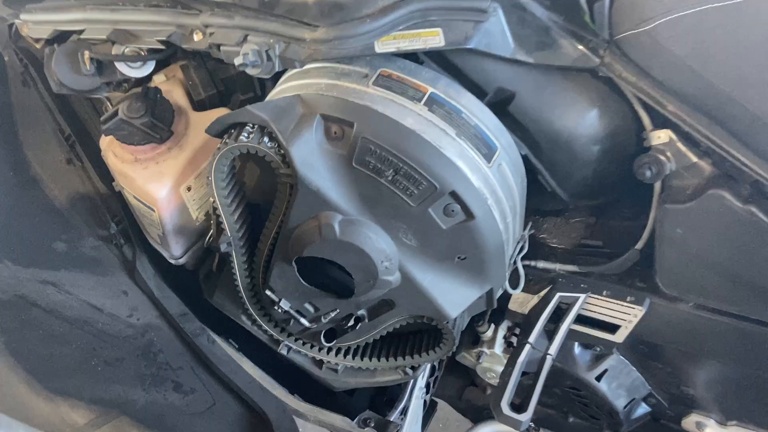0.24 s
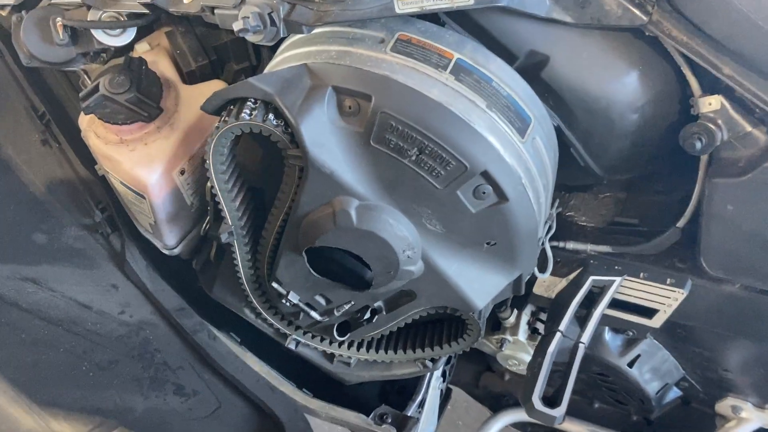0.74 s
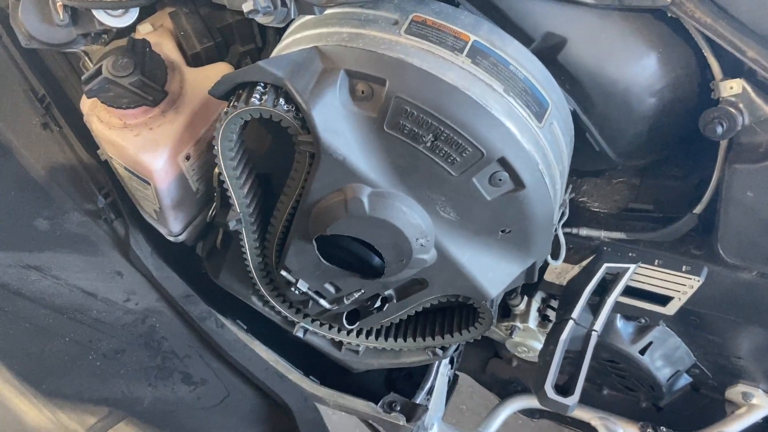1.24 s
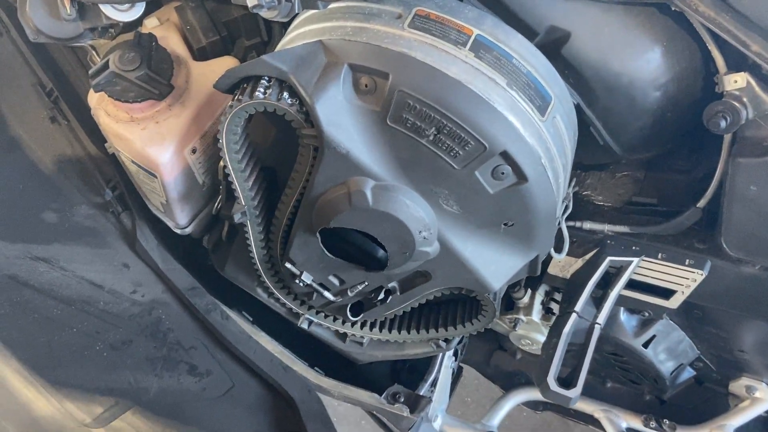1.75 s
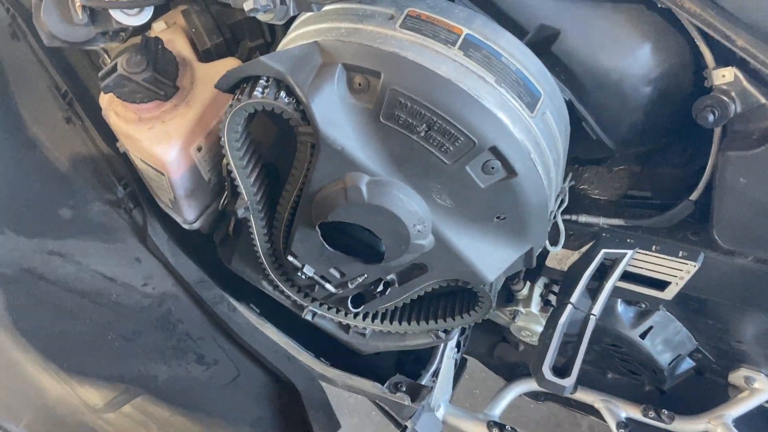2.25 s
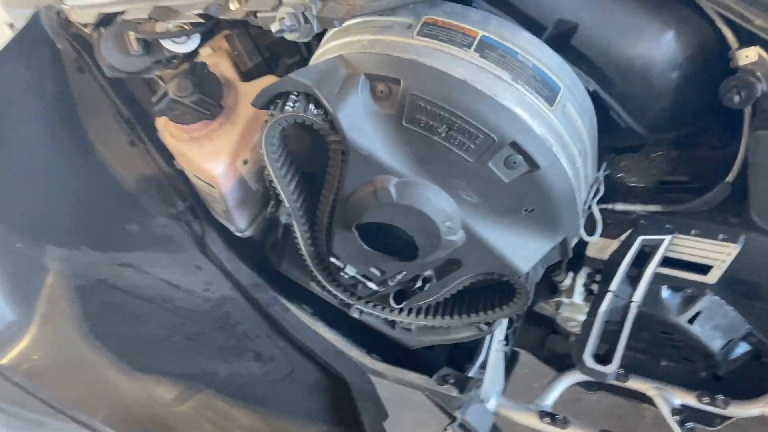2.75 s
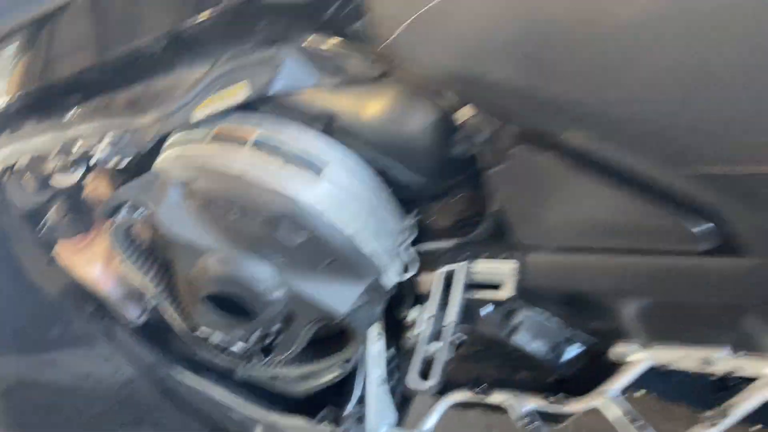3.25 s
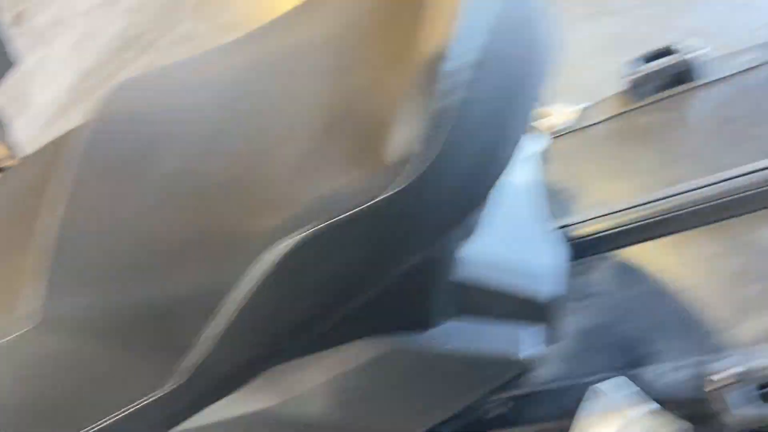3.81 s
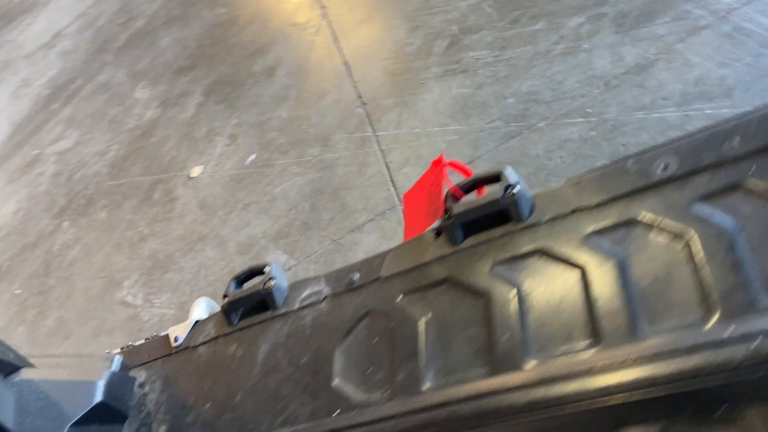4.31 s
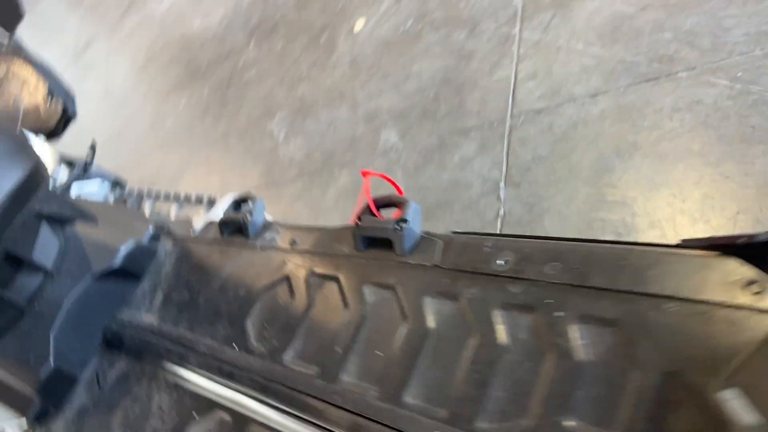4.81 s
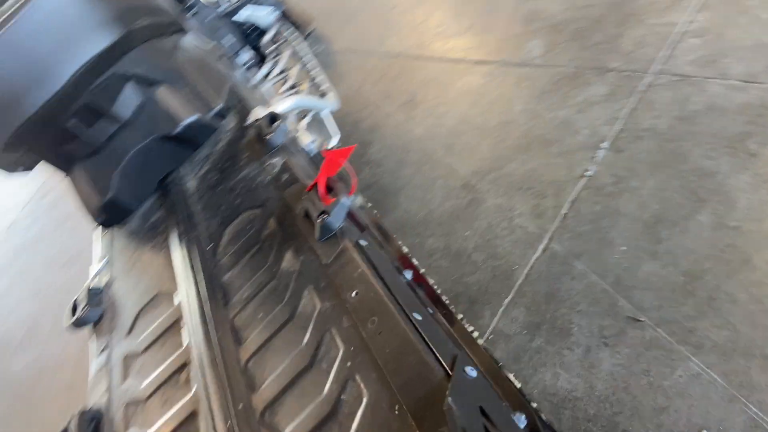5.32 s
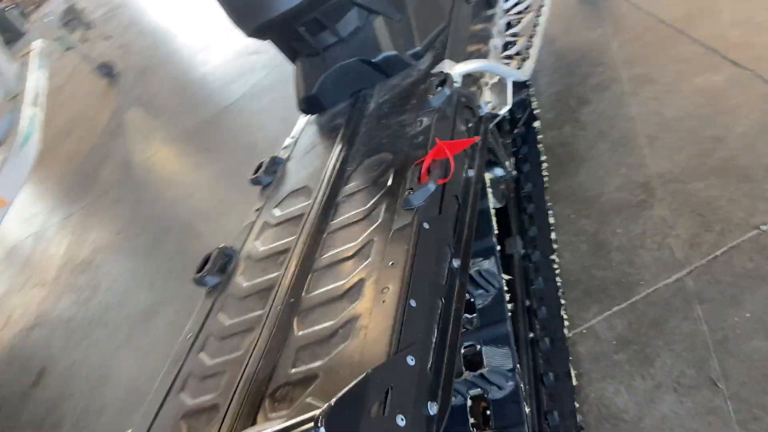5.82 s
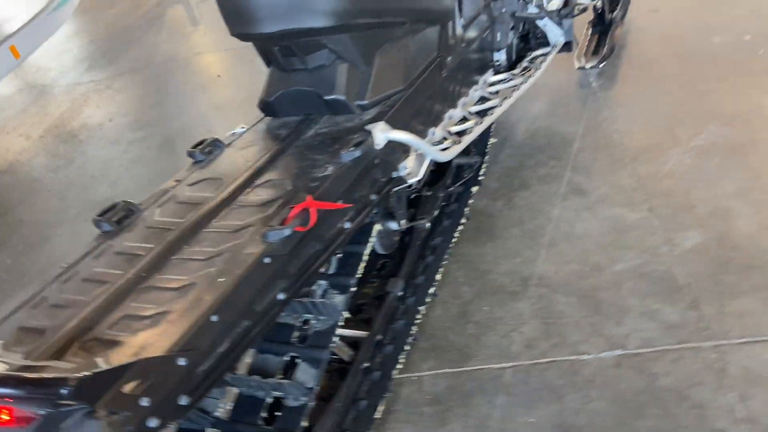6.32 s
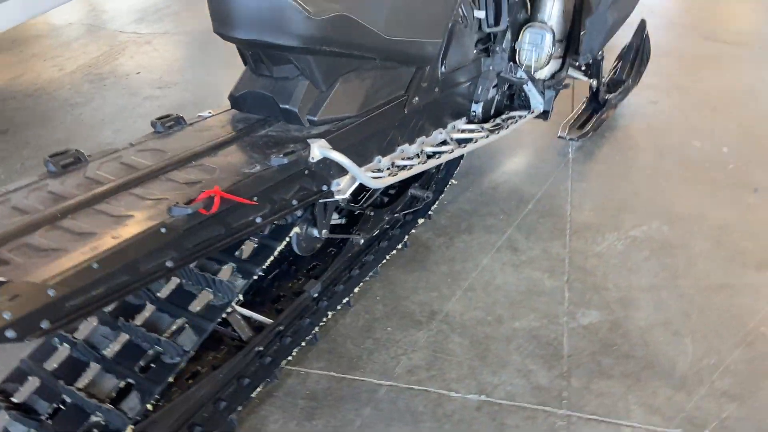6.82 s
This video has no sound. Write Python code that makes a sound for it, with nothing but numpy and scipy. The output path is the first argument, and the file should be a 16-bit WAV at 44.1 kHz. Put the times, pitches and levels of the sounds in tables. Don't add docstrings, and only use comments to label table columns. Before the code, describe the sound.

Handheld close pickup of a snowmobile engine idling indoors, running throughout. It begins bright and busy: a low exhaust hum, rapid rough chugging, sharp slaps and rattling metal over airy hiss. Midway the microphone moves behind the seat, briefly passing brighter rattles, and the engine becomes duller and quieter with a cluster of hollow misfire knocks. Finally, beside the track, the drone strengthens and a thin panel buzzes with each turn.

```python
import sys
import numpy as np
from scipy import signal
from scipy.fft import rfft, irfft, next_fast_len
from scipy.io import wavfile
from scipy.ndimage import uniform_filter1d

SR = 44100
rng = np.random.default_rng(int(sys.argv[2]) if len(sys.argv) > 2 else 0)


def voltage_ratio(level):
    return 10 ** (np.asarray(level, float) / 20)


def transcribe(u):
    v = np.clip(np.atleast_2d(u).T, -1, 1)
    q = np.round(v * 32767).astype(np.int16)
    wavfile.write(sys.argv[1], SR, q)


N = 311330


# time in seconds, level of the sixth crank order in dB.
DRONE = [(0, -18.5), (.1, -17.5), (.5, -17), (1.5, -15.5), (1.95, -17.5), (2.2, -16.5), (2.4, -17.5),
         (2.7, -17), (3.2, -17), (3.7, -19.5), (4.3, -22), (4.8, -22), (5.1, -22), (5.5, -20.5),
         (5.85, -20), (6.5, -18.5), (6.95, -17), (7.06, -18)]
# order, then dB over the bay, behind the seat, by the track.
FIRING = [(2, -10, -7.5, -12), (4, -11.5, -10.5, -15), (8, -17, -15.5, -17.5), (10, -27, -20.5, -41),
          (14, -13.5, -13.5, -18), (16, -33, -14, -22), (20, -20, -14.5, -23.5)]
# order, then dB at the same three places.
UNEVEN = [(3, 3, 4.5, 3), (5, 1.5, 0, 3), (7, -2.5, 2.5, 1.5), (9, -3, -7, -5.5), (11, -2.5, -3, -9),
          (13, -5, -4.5, -9), (17, -2.5, 2, -9), (19, -20, 1, -1)]
# time in seconds, twelfth order in dB, eighteenth order in dB.
FLOOR_LIFT = [(0, -1, -10), (.4, -3, -10), (.9, 1, 0), (1.25, -1, 3), (1.5, -3, -6), (2.1, -3, 1),
              (2.5, -1, 1), (2.95, 1, -6), (3.9, -5, -5.5), (4.2, 0, -1.5), (5.0, 1, 2), (5.5, 1, -1),
              (5.9, -6, -10.5), (6.4, 0, 0), (7.06, -0.5, 1)]
# over the bay in dB, behind the seat in dB, by the track in dB.
TWELFTH = (-31.5, -27.5, -27)
EIGHTEENTH = (-29.5, -30, -29.5)
THIRD = (-37.5, -34, -35.5)
CHOKE = (0.092, .8, 0.76)


def exhaust(turns, place):
    angle = 2 * np.pi * (turns + 0.022)

    def tone(order, late):
        strength = voltage_ratio(0.069 * order * wobble(20)) * np.sqrt(2)
        return strength * np.cos(order * angle - late + 0.017 * order * wobble(11))

    def wandering(order):
        return wobble(11) * np.cos(order * angle) + wobble(11) * np.sin(order * angle)

    twelfth_lift, eighteenth_lift = curves(FLOOR_LIFT)
    sixth_db = curves(DRONE)[0] - seen(place, CHOKE) * gasps(PUFF_S) + 0.51 * wobble(8)
    twelfth_db = seen(place, TWELFTH) + twelfth_lift + 0.8 * wobble(5)
    eighteenth_db = seen(place, EIGHTEENTH) + eighteenth_lift + 0.8 * wobble(5)
    third_db = seen(place, THIRD) + 1.28 * gasps(LUMP_S)
    tuned = voltage_ratio(sixth_db - 0.1) * tone(order=6, late=0)
    tuned = tuned + voltage_ratio(twelfth_db - 1.5) * tone(order=12, late=0)
    tuned = tuned + voltage_ratio(eighteenth_db - 0.4) * tone(order=18, late=0)
    even = sum(voltage_ratio(seen(place, dbs)) * tone(order, np.pi / 2 if order < 6 else np.pi)
               for order, *dbs in FIRING)
    odd = sum(voltage_ratio(seen(place, dbs)) * wandering(order) for order, *dbs in UNEVEN)
    even_level = voltage_ratio(uniform_filter1d(sixth_db, size=SR // 3))
    return tuned + even_level * even + voltage_ratio(third_db - 3.0) * odd


def clatter(turns, place):
    rattle = contact_noise(turns, axis=3, bed_db=-7)
    return (block_rumble(turns, place) + case_ring(turns, place, rattle)
            + piston_slap(turns, place) + loose_parts(turns, rattle))


# frequency in Hz, density in dB per Hz.
RUMBLE = [(25, -30), (40, -1.5), (100, 1.5), (150, 1), (200, -0.5), (380, 0), (480, -4.5), (700, -5),
          (1300, -28.5)]
# share of the shade, share of a gasp, own flutter in dB, then dB at bay, seat and track.
RUMBLE_MIX = (0.43, 1.08, 1, -28.5, -29, -30.5)
GASP_HEARD = (1, .6, .6)


def block_rumble(turns, place):
    db = level_db(place, RUMBLE_MIX) - (1 - seen(place, GASP_HEARD)) * gasps(PUFF_S)
    shaking = contact_noise(turns, axis=2, bed_db=4.0)
    return voltage_ratio(db + 5) * unit(filtered(shaking, lambda hz: voltage_ratio(along(RUMBLE, hz))))


# frequency in Hz, width in Hz, level in dB.
CASE = [(474, 64, -0.5), (845, 82, -2), (983, 95, 1), (1125, 112, -5), (1432, 140, -7.5)]
# frequency in Hz, width in Hz, level in dB.
CASE_FAR = [(778, 143, -4), (1020, 210, -3.5), (1465, 440, -11.5)]
# frequency in Hz, width in Hz, level in dB.
PISTON = [(1117, 246, 4.5), (4600, 700, -17)]
# frequency in Hz, width in Hz, level in dB.
BELL = [(1000, 135, 1.5), (1493, 130, -3.5)]
CASE_MIX = (0.98, -0.08, 1, -23, -24.5, -25.5)


def case_ring(turns, place, rattle):
    open_bay = bay_in_view(place)
    first = unit(filtered(taps(turns, .11), twice(PISTON)))
    cover_taps = 0.95 * taps(turns, .6) + taps(turns, .72) + 0.65 * taps(turns, 0.24)
    second = unit(filtered(cover_taps, twice(BELL)))
    bare = .7 * unit(filtered(rattle, ringing(CASE))) + .32 * first + .55 * second
    far = unit(filtered(rattle, ringing(CASE_FAR)))
    case = np.sqrt(open_bay) * bare + np.sqrt(1 - open_bay) * far
    return voltage_ratio(level_db(place, CASE_MIX) + 0.86) * case


# frequency in Hz, density in dB per Hz.
SLAP = [(500, -9.5), (1300, -1), (2000, -1), (3000, -8.5), (4300, -10), (5200, -14), (6200, -16.5),
        (7000, -60)]
SLAP_MIX = (0.52, 0.61, 0.64, -33.5, -32.5, -37)


def piston_slap(turns, place):
    open_bay = bay_in_view(place)
    behind = np.clip(1 - np.abs(place - 1), 0, 1)
    echoes = .5 * (1 - open_bay) * rng.standard_normal((2, N))
    ticks = 8 * taps(turns, .095) + 6 * taps(turns, .575)
    slaps = contact_noise(turns, axis=4, bed_db=-5.5) + echoes + (.35 + .65 * open_bay) * ticks
    slap = unit(filtered(slaps, lambda hz: voltage_ratio(along(SLAP, hz))))
    return voltage_ratio(level_db(place, SLAP_MIX) + 6.5) * (1 - 0.46 * behind) * slap


# time in seconds, belt guard in dB, seat frame in dB.
PASSING = [(0, -49, -55), (3.0, -46, -50), (3.27, -33, -44), (3.55, -42.5, -40), (3.8, -50, -36),
           (4.1, -55, -39), (4.5, -58, -43), (5.2, -60, -53), (7.06, -60, -55)]
# time in seconds, level in dB.
PANEL = [(0, -44), (3.2, -43), (3.8, -50), (5.25, -50), (5.55, -38), (6.3, -37), (7.06, -36.5)]
# frequency in Hz, width in Hz, level in dB.
SEAT = [(2690, 1300, 0.75)]
# frequency in Hz, width in Hz, level in dB.
GUARD = [(2504, 250, -1), (3320, 410, -4.5)]
# frequency in Hz, width in Hz, level in dB.
SHEET = [(1895, 140, 0), (2650, 300, -10), (1500, 150, -9)]


def loose_parts(turns, rattle):
    guard_db, frame_db = curves(PASSING)
    panel_db, = curves(PANEL)
    frame = unit(filtered(contact_noise(turns, axis=5, bed_db=4, scatter_db=2.5), twice(SEAT)))
    guard_taps = taps(turns, .11, 2.2) + 0.9 * taps(turns, .6, 3.3)
    guard = unit(filtered(0.047 * rattle + guard_taps, twice(GUARD)))
    panel_taps = taps(turns, .17, 1.6) + .2 * taps(turns, .7, 2.5)
    panel = unit(filtered(.008 * rattle + panel_taps, twice(SHEET)))
    return voltage_ratio(panel_db) * panel + voltage_ratio(guard_db) * guard + voltage_ratio(frame_db) * frame


# time in seconds, peak in dB, crack against it in dB.
SLAPS = [(0.1575, -12, -18), (0.2593, -12, -16), (0.3631, -12, -13), (0.5706, -10, -15), (0.6714, -13, -12),
         (0.7736, -10, -16), (0.8754, -12, -17), (0.9802, -17, -18), (1.0819, -13, -12), (1.1842, -12, -15),
         (1.2865, -11, -15), (1.3384, -12, -20), (1.495, -12, -19), (1.5469, -12, -15), (1.6516, -13, -11),
         (1.7534, -12, -11), (1.8058, -11, -15), (1.9565, -12, -14), (2.0587, -11, -20), (2.1076, -14, -17),
         (2.2129, -12, -15), (2.3635, -12, -16), (2.5701, -14, -14), (2.6209, -11, -17), (2.7257, -12, -15),
         (2.8744, -12, -17), (3.021, -14, -14), (3.1527, -14, -13)]
# time in seconds, peak in dB.
KNOCKS = [(3.594, -16), (3.747, -17), (3.98, -12), (4.131, -15), (4.184, -19), (4.238, -8.5), (4.312, -16),
          (4.388, -15), (4.44, -11), (4.493, -11), (4.568, -15), (4.745, -13), (5.759, -22), (6.163, -10.5)]
# frequency in Hz, width in Hz, level in dB.
THUD = [(236, 160, 1.5), (384, 83, 7.5), (560, 280, -15)]


def knocks(turns):
    s, db, crack_db = np.transpose(SLAPS)
    at = np.flatnonzero(np.diff(np.floor(turns - .11)))
    nearest = np.abs(at[:, None] - s * SR).argmin(axis=0)
    hits = np.zeros(N)
    hits[at[nearest]] = voltage_ratio(db + 23)
    ring = filtered(off_floor(hits), twice(PISTON))
    crack = filtered(blows(s, db + crack_db + 14, t60=0.062), lambda hz: voltage_ratio(along(SLAP, hz)))
    s, db = np.transpose(KNOCKS)
    thud = filtered(blows(s, db + 9, t60=0.028), ringing(THUD))
    return ring + crack + thud


# frequency in Hz, density in dB per Hz.
HISS = [(5500, -32), (6400, -0.5), (7200, 0), (9000, 2), (11000, -2), (13000, -2), (15500, -7.5),
        (16500, -7)]
HISS_MIX = (1, 0.91, 1, -43, -44, -43)
LEFT_LAG_S = .000225


def hiss(turns, place):
    puffs = beats(turns, axis=6, bed_db=-4.5, scatter_db=3)
    gusts = uniform_filter1d(puffs, size=SR // 90) * voltage_ratio(0.63 * wobble(45))
    ports = lambda hz: np.array([-np.exp(-2j * np.pi * hz * LEFT_LAG_S), np.ones_like(hz)])
    air = unit(filtered(gusts * rng.standard_normal(N), lambda hz: voltage_ratio(along(HISS, hz)) * ports(hz)))
    return voltage_ratio(level_db(place, HISS_MIX) + 8.5) * air


# time in seconds, speed in rpm.
IDLE = [(0.0, 1154.5), (0.57, 1125.7), (2.19, 1156.0), (2.2, 1105.4), (3.08, 1081.5), (3.46, 1189.1),
        (3.59, 1105.1), (7.06, 1147.4)]
# time in seconds, kick in rpm.
KICKS = [(.133, 49), (.242, 10), (.379, 6), (.466, 26), (.605, 67), (.863, 16), (.989, 26), (1.134, 29),
         (1.67, 15), (1.85, 70), (2.255, 136), (2.48, 51), (2.593, 33), (2.761, 149), (2.908, 108),
         (3.259, 73), (3.44, 40), (3.622, 67), (3.89, 101), (4.249, 83), (4.48, 62), (4.656, 83),
         (5.08, 55), (5.311, 99), (5.568, 86), (5.818, 37), (6.021, 100), (6.236, 129), (6.761, 65)]
START_TURN, KICK_RISE_S, KICK_SAG_S = .0757, .015, .2168


def crank():
    t = np.arange(N) / SR
    rpm = curves(IDLE)[0]
    for s, kick in KICKS:
        since = np.maximum(t - s, 0)
        rpm = rpm + kick * (np.exp(-since / KICK_SAG_S) - np.exp(-since / KICK_RISE_S))
    return START_TURN + np.cumsum(rpm) / 60 / SR


# angle in turns, decay in turns, then rumble, case, slap,
# seat frame and hiss, all in dB.
TURN = [(0.089, 0.24, 0, -5, 2, 19, -0.5), (0.168, 0.18, -9, -7, 0.5, 13, -12),
        (0.332, 0.092, -8, -3, -14, 17.5, 1), (0.564, 0.29, -10, -5.5, 0.5, 18, -4.5),
        (0.718, 0.077, -11, 0, -21, -15, 0.5)]


def beats(turns, axis, bed_db, scatter_db):
    power = voltage_ratio(2 * bed_db)
    for row in TURN:
        since = turns + 1 - row[0]
        size = voltage_ratio(row[axis] + scatter_db * rng.standard_normal(200))[since.astype(int)]
        power = power + (size * np.exp(-(since % 1) / row[1])) ** 2
    return np.sqrt(power)


def contact_noise(turns, axis, bed_db, scatter_db=1.3):
    return beats(turns, axis, bed_db, scatter_db) * rng.standard_normal((2, N))


def off_floor(x):
    return np.array([x, np.roll(x, 47)])


def taps(turns, angle, scatter_db=1.3):
    at = np.flatnonzero(np.diff(np.floor(turns - angle)))
    tap = np.zeros(N)
    tap[at] = voltage_ratio(scatter_db * rng.standard_normal(200))[:len(at)]
    return off_floor(tap)


def blows(times, dbs, t60):
    strike = np.zeros(N)
    strike[(np.asarray(times) * SR).astype(int)] = voltage_ratio(dbs)
    decay = voltage_ratio(-60 * np.arange(SR // 10) / SR / t60)
    return signal.fftconvolve(strike, decay)[:N] * rng.standard_normal((2, N))


# time in seconds, swell in dB.
PUFFS = [(.17, 1), (.28, 2.5), (.38, 0.5), (.5, 3), (.6, 5), (.7, 1.5), (.81, 2), (.91, 0.5), (1.0, 2.5),
         (1.13, 3.5), (1.57, 6), (1.67, 6), (1.8, 2), (2.25, 7), (2.49, 0.5), (2.62, 4), (2.74, 5),
         (2.82, 4), (3.44, 5.5), (3.64, 3), (3.9, 2), (4.28, 1.5), (4.49, 2), (4.67, 4), (5.08, 5.5),
         (5.14, 1.5), (5.29, 4.5), (5.6, 2.5), (5.85, 4), (6.32, 0)]
PUFF_S, LUMP_S = 0.016, 0.074


def gasps(half_s):
    t = np.arange(0, N, 64) / SR
    bumps = sum(db * np.exp(-((t - s) / half_s) ** 2) for s, db in PUFFS)
    return np.interp(np.arange(N) / SR, t, bumps)


# time in seconds, level change in dB.
SHADE = [(0, -1.5), (.35, 0), (3.2, 0.5), (3.5, -6.5), (4.03, -12), (4.9, -13), (5.15, -10.5), (5.5, -8.5),
         (5.95, -7), (7.06, -5)]


def level_db(place, mix):
    shade, gasp, flutter_db, *dbs = mix
    shaded = seen(place, dbs) + shade * curves(SHADE)[0]
    return shaded + gasp * gasps(PUFF_S) + flutter_db * wobble(14)


def seen(place, values):
    return np.interp(place, np.arange(len(values)), values)


def bay_in_view(place):
    return np.clip(1 - 2.3 * place, 0, 1)


def unit(x):
    return x / np.sqrt(np.mean(x ** 2) + 1e-20)


def along(points, hz):
    f, v = np.transpose(points)
    return np.interp(np.log(hz + 1), np.log(f + 1), v)


def curves(rows):
    s, *cols = np.transpose(rows)
    return [np.interp(np.arange(N) / SR, s, c) for c in cols]


def wobble(rate):
    fine = signal.resample(rng.standard_normal(int(N * rate / SR) + 2), 4000)
    return np.interp(np.arange(N) / N, np.arange(len(fine)) / len(fine), fine)


def filtered(x, response):
    m = next_fast_len(N + SR // 2)
    return irfft(rfft(x, m) * response(np.fft.rfftfreq(m, 1 / SR)), m)[..., :N]


def ringing(modes):
    def response(f):
        return sum((-1) ** k * voltage_ratio(db) * 1j * f * w / (c * c - f * f + 1j * f * w)
                   for k, (c, w, db) in enumerate(modes))
    return response


def twice(modes):
    return lambda f: ringing(modes)(f) ** 2


# frequency in Hz, left-right likeness.
ALIKE = [(100, 1.7), (300, 0.8), (700, 0.72), (1100, 0.66), (1800, .5), (3000, 0.67), (4500, 0.8),
         (5800, 0.23)]
# frequency in Hz, left over right in dB.
LEAN = [(200, -6), (600, 2.5), (1200, -1), (2600, 5), (3600, 3.5), (5000, 2.5), (6300, 2)]


def spread(pair):
    def split(hz):
        turn = np.arccos(np.clip(along(ALIKE, hz), -1, 1)) / 2
        return np.array([np.cos(turn), np.sin(turn)])

    def lean(hz):
        return voltage_ratio(np.outer([.5, -.5], along(LEAN, hz))) / (1 + (hz / 6400) ** 24)

    mid, side = filtered(pair, split)
    return filtered(np.array([mid + side, mid - side]), lean)


# time in seconds, place (0 bay, 1 seat, 2 track), left lead in ms,
# left over right in dB.
PLACE = [
    (0, 0, 0, .3),
    (3.1, 0, 0, .3),
    (3.9, 1, .17, 1),
    (4.9, 1, .12, 1),
    (5.6, 2, 0, -.5),
    (7.06, 2, 0, -.5),
]


def scene():
    turns = crank()
    place, lead_ms, pan_db = curves(PLACE)
    drone = exhaust(turns, place) * voltage_ratio([[.3], [-.3]])
    left, right = drone + spread(clatter(turns, place) + knocks(turns))
    low = filtered(left, lambda hz: 1 / (1 + (hz / 1900) ** 6))
    left = left - low + np.interp(np.arange(N) + lead_ms * SR / 1000, np.arange(N), low)
    return np.array([left * voltage_ratio(pan_db / 2), right * voltage_ratio(-pan_db / 2)]) + hiss(turns, place)


def band_limit(x):
    return signal.sosfilt(signal.butter(12, 16900, fs=SR, output="sos"), x)


# from Hz, to Hz.
EMPTY_SUM = [(8560, 9380), (13050, 13700), (15780, 22050)]
# from Hz, to Hz.
EMPTY_DIFFERENCE = [(6650, 7560), (10750, 11720), (14750, 22050)]


def record(dry):
    kept = lambda hz, bands: 1 - sum((hz > lo) & (hz < hi) for lo, hi in bands)
    cut = lambda hz: (hz / 31) ** 4 / (1 + (hz / 31) ** 4)
    pair = np.array([dry[0] + dry[1], dry[0] - dry[1]]) / 2
    mid, side = filtered(pair, lambda hz: cut(hz) * [kept(hz, EMPTY_SUM), kept(hz, EMPTY_DIFFERENCE)])
    return band_limit(np.array([mid + side, mid - side]))


dry = scene()
out = record(dry)
transcribe(out)
```